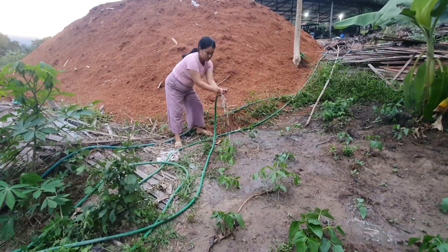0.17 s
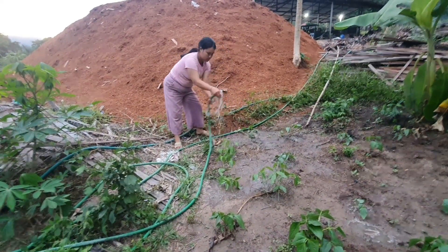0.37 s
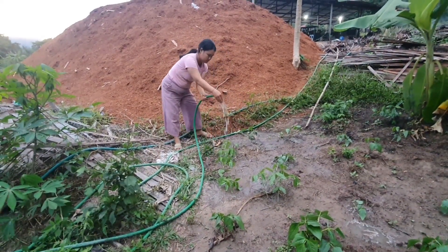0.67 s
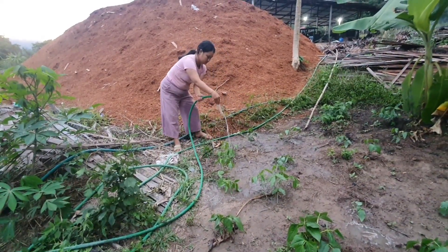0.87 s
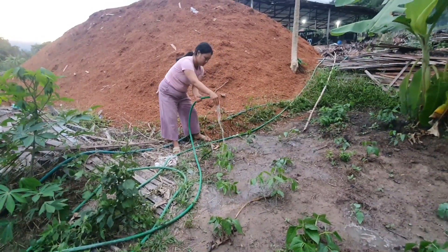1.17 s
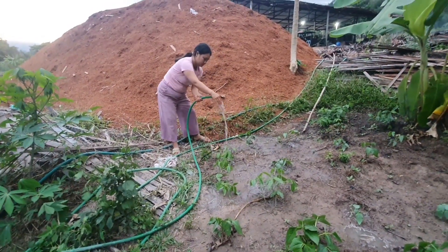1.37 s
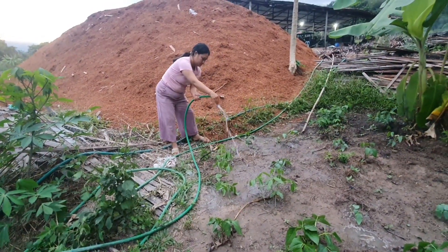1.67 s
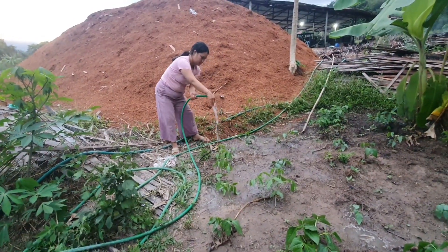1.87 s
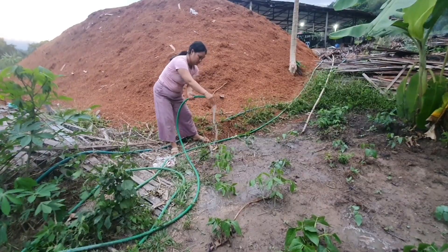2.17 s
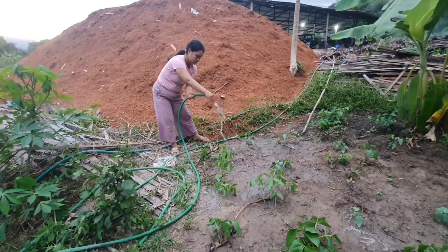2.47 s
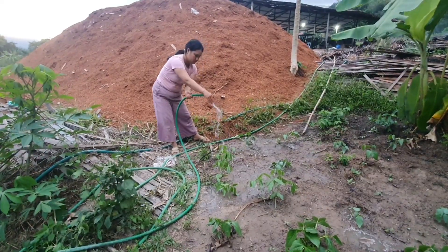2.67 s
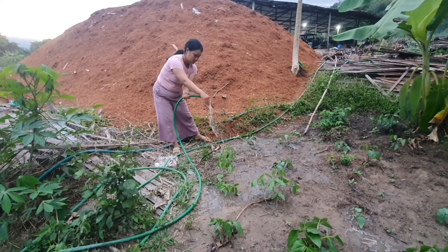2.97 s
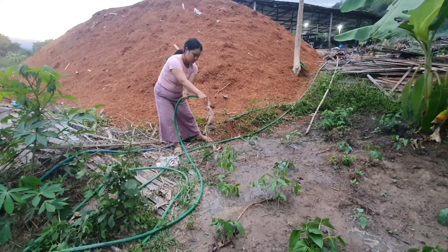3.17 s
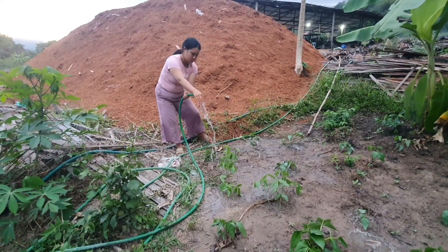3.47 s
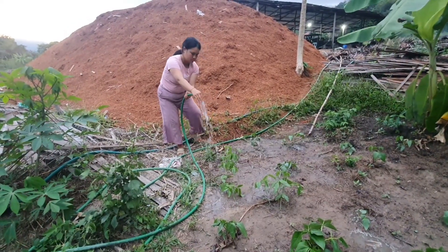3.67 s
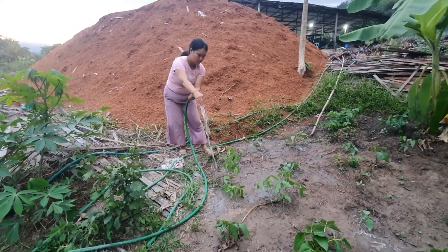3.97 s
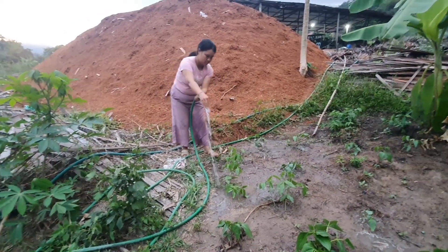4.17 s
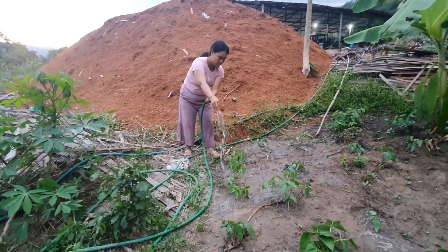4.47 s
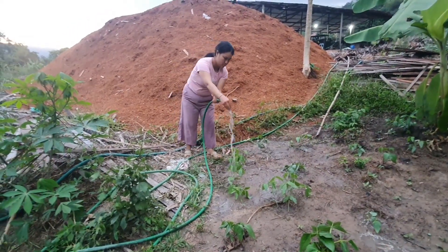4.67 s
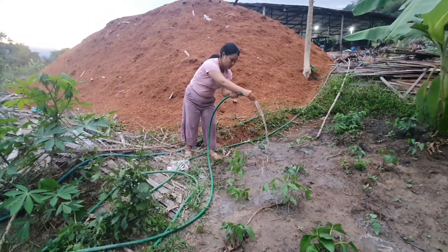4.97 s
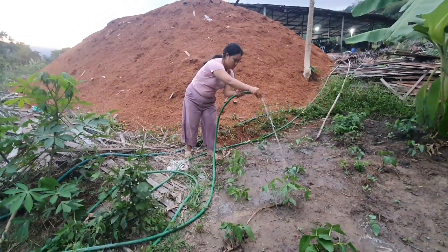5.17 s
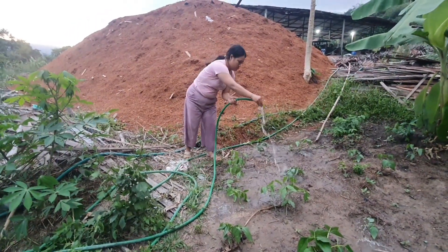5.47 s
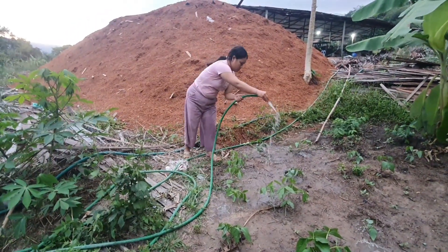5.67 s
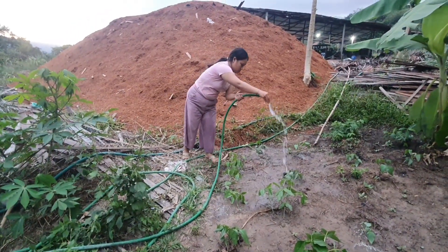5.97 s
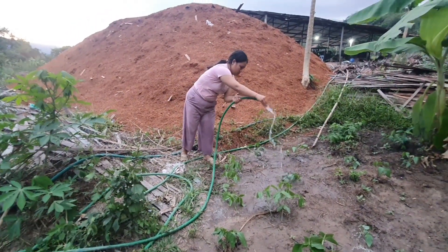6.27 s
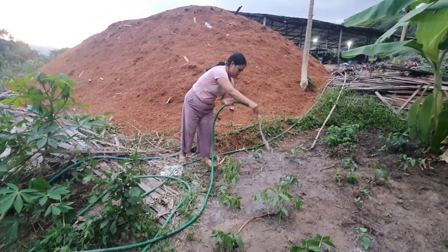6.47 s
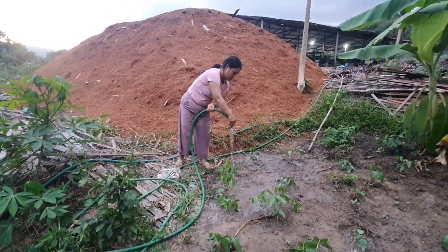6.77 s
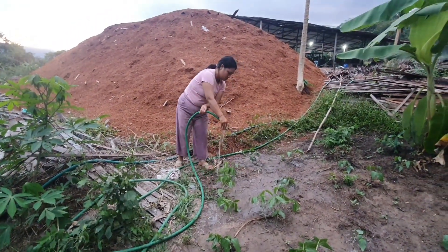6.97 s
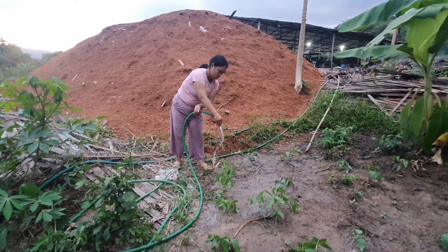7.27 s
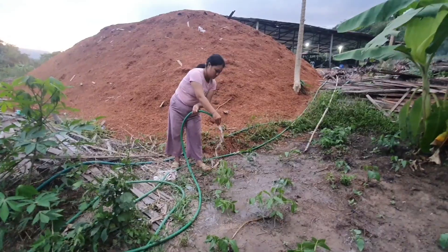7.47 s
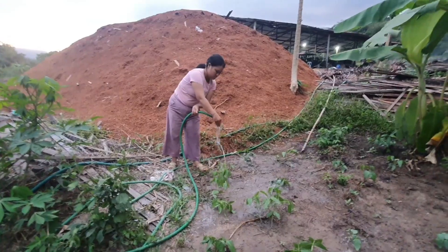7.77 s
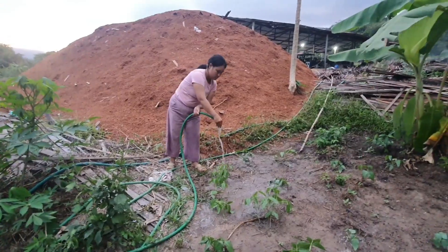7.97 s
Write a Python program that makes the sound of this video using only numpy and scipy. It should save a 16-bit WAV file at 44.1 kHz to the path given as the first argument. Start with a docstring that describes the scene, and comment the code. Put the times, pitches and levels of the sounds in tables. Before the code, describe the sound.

A garden hose pours unevenly onto mud and leaves, slapping and pattering, while a distant engine drones low and drops away near the end.

```python
"""A garden hose pours a loose stream onto wet soil and seedlings, a few metres from two microphone ports outdoors.
Short ringing noise bursts make the drops and the lumps that slap the mud; hiss makes the spray on the leaves.
Now and then the stream gushes into a puddle: rough froth from noise, bubbles from brief rising tones.
A distant engine, built from wavering tones, drones with a faint whine and drops away after six seconds.
Filtered noise gives a low, swelling murmur of open air; a faint whistle and one light knock pass by."""
import sys
import numpy as np
from scipy import signal
from scipy.fft import rfft, irfft, next_fast_len
from scipy.io import wavfile
from scipy.ndimage import uniform_filter1d

SR = 44100
rng = np.random.default_rng(int(sys.argv[2]) if len(sys.argv) > 2 else 0)


def master_out(mix):
    """Clip the mix to full scale and print it as 16-bit PCM to the path in sys.argv[1]."""
    frames = np.transpose(np.atleast_2d(mix))
    ceiling = np.clip(frames, -1, 1)
    pcm = np.round(ceiling * 32767).astype(np.int16)
    wavfile.write(sys.argv[1], SR, pcm)


N = 358136
T = np.arange(N) / SR

# Levels in the tables are relative: later gains and filters shift them.
# the stream as it lands, moving from bare mud towards the seedlings:
# t/s, patter level on mud/dB, spray level on leaves/dB
STREAM = [(0, -52, -54), (0.2, -45.5, -58), (0.32, -54.5, -69), (0.53, -64, -59), (0.6, -45, -53.5),
          (0.8, -45.5, -60), (1.15, -49, -55), (1.9, -46, -53.5), (2.22, -49, -56.5), (2.75, -41.5, -56),
          (3.2, -46.5, -52.5), (3.85, -45.5, -50.5), (4.6, -44.5, -47.5), (5.1, -45, -48),
          (5.6, -43, -47.5), (5.85, -47.5, -50.5), (6.9, -45.5, -49), (8.12, -45, -55.5)]
# tone colour of the small drops on mud: f/Hz, level/dB
PATTER_COLOUR = [(500, -1), (1000, -12), (1600, 5), (2300, -1), (3000, 2.5), (4200, 4.5), (6000, 1.5),
                 (7500, 2.5), (8600, -20), (15000, -28)]
# tone colour of the fine spray: f/Hz, level/dB
SPRAY_COLOUR = [(1500, -5.5), (3500, 10), (6000, 5), (7600, 15.5), (8600, 1.5), (10000, -0.5), (11700, 9),
                (13500, 8), (15500, 5)]
# tone colour of drops cracking on leaves: f/Hz, level/dB
LEAF_COLOUR = [(1500, -6), (4000, -1), (7500, 8.5), (9000, -2.5), (12000, 4), (15500, 1)]
# narrow bands that all splashes on this ground favour: f/Hz, level/dB
GROUND_COLOUR = [(950, -2), (1130, 3), (1400, -5), (1750, 2.5), (1950, -2), (2200, 0), (2500, 2),
                 (3020, 1.5), (3280, 0.5), (3600, -1.5), (3900, 0.5), (4250, -1.5), (4600, -0.5)]
# distant engine, speeding up a little, then throttled back: t/s, firing rate f/Hz, level of the firing tone/dB
ENGINE = [(0, 53.3, -30), (0.3, 54.2, -36), (0.45, 52.83, -32.5), (1.2, 53.74, -35), (1.8, 52.55, -36),
          (2.5, 53.06, -32.5), (3.1, 52.86, -37.5), (3.7, 53.6, -32), (4.1, 54.85, -37), (5, 56.6, -37),
          (5.35, 56.15, -32), (5.85, 56.33, -33), (6.7, 48.26, -55), (7.6, 43.9, -57), (8.12, 45.7, -48)]
# weaker engine tones: multiple of the firing rate (no unit), level relative to the firing tone/dB
ENGINE_LINES = [(0.83, -21), (1.47, -20), (2.02, -21)]
# a second, higher drone: t/s, f/Hz, level/dB
DRONE = [(0, 95, -42), (1.3, 93.1, -48), (2.03, 92.4, -38.5), (3.1, 92.3, -43), (3.5, 94, -64),
         (4.2, 95, -50), (5.4, 97.1, -49), (6.25, 99, -48.5), (6.7, 99.7, -41.5), (7.15, 101, -51),
         (8.12, 101, -49.5)]
# machine whine: t/s, relative speed (no unit), level/dB, level of its low hum/dB
WHINE = [(0, 1.008, -57.5, -62), (0.7, 0.997, -57, -59), (1.2, 0.992, -56, -59), (2.2, 0.992, -57, -59),
         (2.6, 0.995, -56.5, -70), (3.4, 1, -58, -70), (4.2, 1.012, -56, -70), (5, 1.028, -60, -82),
         (5.8, 1.03, -74, -78), (8.12, 1, -76, -87)]
# partial tones of the whine: f/Hz at speed 1, level/dB, pitch flutter/Hz
WHINE_LINES = [(377, -1.5, 1.7), (554, -1, 6), (745, -2, 3.1), (1136, -19, 6.4)]
# far machinery under the whine: t/s, level/dB
MACHINERY = [(0, -46.5), (1.5, -48.5), (2.8, -46), (3.6, -50), (5.6, -48), (6.6, -52), (8.12, -54.5)]
# its tone colour: f/Hz, level/dB
MACHINERY_COLOUR = [(120, 3), (200, 0), (280, 0.5), (500, -2.5), (750, 4), (920, -2.5), (1150, 3.5),
                    (1450, -5.5), (2500, -12.5), (6000, -29)]
# deep outdoor rumble: t/s, level/dB
RUMBLE = [(0, -40.5), (0.55, -43), (1, -44.5), (1.4, -46), (1.8, -42.5), (2.8, -41.5), (3.6, -49),
          (4.35, -41.5), (4.85, -54), (5.7, -47.5), (6.65, -52), (7, -49), (8.12, -54)]
# its tone colour: f/Hz, level/dB
RUMBLE_COLOUR = [(15, -16), (28, -5), (42, 2.5), (62, 10), (85, 4.5), (110, -0.5), (130, -11.5), (155, -9),
                 (185, -15.5), (230, -34.5), (400, -51.5)]
# swells of the wide murmur: t/s at the crest, level/dB, half-length/s
MURMUR_SWELLS = [(2.62, -53.5, 0.56), (4.01, -52, 0.16), (4.434, -52.5, 0.18), (5.59, -49.5, 0.24),
                 (6.12, -53, 0.16), (7.7, -58, 0.4)]
# tone colour of the murmur: f/Hz, level/dB
MURMUR_COLOUR = [(120, -15), (220, -14), (320, -1.5), (450, 1.5), (570, 5), (720, -20.5), (1000, -7.5),
                 (1500, -26.5), (4000, -47.5)]
# the biggest lumps of water hitting mud: t/s, level/dB, f/Hz
SLAPS = [(0.0808, -34, 3200), (0.106, -33, 3600), (0.121, -39, 3640), (0.3993, -23.5, 4650),
         (0.4296, -30.5, 2700), (0.598, -40, 3800), (0.618, -34, 4100), (0.6777, -36, 3280),
         (0.713, -33, 4230), (0.735, -35, 3020), (0.754, -31.5, 3840), (0.814, -27, 2920),
         (0.9078, -34, 4000), (0.936, -27, 4230), (0.9647, -21, 3300), (1.005, -39, 2900),
         (1.028, -31, 2840), (1.122, -35.5, 3275), (1.1744, -39, 3330), (1.188, -34, 4000),
         (1.22, -25, 2700), (1.232, -23.5, 3840), (1.251, -24.5, 4030), (1.2584, -22.5, 5800),
         (1.4003, -34, 2853), (1.413, -23.5, 3550), (1.465, -34, 2950), (1.515, -30.5, 3980),
         (1.535, -30, 3160), (1.558, -30, 3240), (1.6415, -24, 6800), (1.729, -32.5, 2800),
         (1.8372, -30.5, 4690), (1.8677, -31, 3900), (1.954, -24.5, 3280), (1.981, -34, 3300),
         (1.992, -36, 3590), (2.063, -28, 3835), (2.073, -20, 4730), (2.083, -26, 4600), (2.1, -35, 6000),
         (2.1225, -24.5, 3920), (2.139, -29, 3670), (2.1638, -31, 4050), (2.2979, -28, 3830),
         (2.328, -26, 2800), (2.4507, -32.5, 3570), (2.5209, -20.5, 2980), (2.6253, -24.5, 1970),
         (2.732, -28, 2970), (2.753, -35, 3470), (2.766, -33, 3440), (2.8785, -25, 3470),
         (2.9438, -27.5, 5360), (2.9563, -25.5, 4170), (2.9797, -23.5, 1970), (3.0638, -20.5, 1670),
         (3.277, -26.5, 5380), (3.3196, -33, 2987), (3.3573, -31, 2720), (3.484, -33, 5310),
         (3.535, -30, 2830), (3.695, -28, 4610), (4.0057, -29, 4515), (4.0246, -26, 4660),
         (4.069, -19.5, 6600), (4.2139, -24, 5610), (4.252, -24.5, 4900), (4.273, -29, 3400),
         (4.345, -35, 3026), (4.407, -21.5, 7400), (4.513, -32, 3600), (4.6826, -23, 7320),
         (4.804, -32, 3060), (4.843, -30, 1830), (4.9076, -25, 7000), (4.9119, -25, 3530),
         (4.977, -27.5, 2930), (4.995, -35, 2790), (5.0802, -34.5, 1223), (5.0814, -24, 3650),
         (5.151, -34, 3080), (5.225, -30, 3934), (5.2917, -29.5, 1483), (5.5628, -32, 3030),
         (5.5928, -28.5, 3950), (5.607, -27.5, 3960), (5.635, -30, 4470), (5.6674, -33, 2980),
         (5.7781, -34, 2080), (5.8245, -25.5, 3600), (5.8792, -28.5, 3060), (5.967, -35, 2920),
         (6.0036, -32.5, 3100), (6.03, -27.5, 2954), (6.057, -24, 7270), (6.0736, -23.5, 1266),
         (6.1885, -34, 7600), (6.2462, -25.5, 3670), (6.2657, -24.5, 3860), (6.5177, -28.5, 3850),
         (6.6104, -28, 3780), (6.689, -29, 3030), (6.651, -31, 3830), (6.7144, -31, 4110),
         (6.8165, -27.5, 3070), (6.889, -28, 3070), (6.914, -26, 3840), (7.177, -29, 4430),
         (7.219, -25.5, 3030), (7.314, -29, 6500), (7.391, -25, 3400), (7.4593, -31.5, 6340),
         (7.6478, -31, 3000), (7.7979, -24.5, 3074), (7.892, -25, 5430), (7.9693, -24, 3500),
         (8.041, -28, 3400)]
# tone colour of the slaps: f/Hz, level/dB
SLAP_COLOUR = [(700, 2), (1500, -1.5), (2500, -5), (2900, -2), (3220, -2.5), (3500, 0), (3720, -3.5),
               (3950, 0), (4500, -2), (7600, -2.5), (8800, -12.5), (15000, -3)]
# drops that crack on a near leaf: t/s, peak level/dB
LEAF_HITS = [(0.156, -28.5), (0.569, -31.5), (1.601, -31.5), (1.7768, -18), (1.788, -21), (1.928, -26),
             (2.754, -26), (3.577, -26.5), (4.069, -30), (4.22, -25), (4.469, -27), (4.909, -18.5),
             (5.916, -21), (6.263, -23), (7.368, -25.5)]
# the stream plunging into puddles, the shallow ones higher in pitch:
# t/s, level/dB, pitch relative to the usual puddle (no unit), time to fall 60 dB/s
GUSHES = [(1.222, -46, 2.2, 0.12), (2.124, -49, 1.3, 0.19), (2.749, -35, 0.98, .45),
          (2.766, -39, 1.38, 0.56), (3.063, -45, 1.1, 0.06), (4.085, -39.5, 2, 0.35),
          (4.263, -36.5, 2.4, 0.11), (6.073, -39, 1.18, 0.084), (6.361, -37, 1.05, 0.5),
          (6.376, -37.5, 1.03, 0.45), (6.398, -40, 1.47, 0.45), (6.483, -40.5, 0.94, 0.1),
          (6.639, -42.5, 0.553, 0.14), (6.872, -41, 1.63, 0.41), (6.963, -48, 1.96, 0.61),
          (7.388, -42, 0.88, 0.072), (7.591, -47.5, 0.74, 0.44), (7.803, -43, 2, 0.28),
          (7.981, -42.5, 1.04, 0.64)]
# tone colour of the usual puddle: f/Hz, level/dB
PUDDLE_COLOUR = [(80, -3), (160, 2), (300, -4.5), (550, -7.5), (800, 2), (1150, 1.5), (1450, -0.5),
                 (1820, 6.5), (2300, -12), (3800, 0), (5000, -11), (9000, -18)]
# a faint falling whistle, like a far bird: t/s, f/Hz, level/dB
WHISTLE = [(2.52, 2590, -66), (2.54, 2570, -57.5), (2.59, 2460, -53), (2.62, 2380, -60), (2.64, 2346, -80)]
# a light knock close by on the left: t/s, peak level/dB
KNOCKS = [(3.8552, -18)]
# tone colour of the knock: f/Hz, level/dB
KNOCK_COLOUR = [(100, 17), (220, 5), (400, 14), (700, 11), (1200, 8), (2200, 8), (3000, -9), (4200, 3),
                (8000, -16), (15000, -32)]
# distant sound at the two ports: f/Hz, phase by which the right leads/rad, level of the unshared part/dB
FAR_PORTS = [(60, 0.13, -6), (140, 0.41, -13), (215, 0.43, -13), (294, 1.14, -9), (413, 1.72, -5),
             (550, 2.45, -12.5), (780, 2.75, -3), (1120, 3.13, -5.5), (1640, 4, -3.5), (2530, 4.64, 4.5)]
# right microphone port relative to the left: f/Hz, level/dB
RIGHT_PORT = [(60, 1), (200, 1.5), (400, 6), (700, 3), (1300, 1.5), (1800, 2.5), (2400, 1.5), (3000, 5),
              (3450, 3.5), (4000, 6.5), (5200, 0.5), (6800, -1), (8100, -2), (9300, 1), (11500, 3.5),
              (15000, -2)]

# how far the unsteady hose sways the stream's level
SLOP_DB = 0.7
# time for a fat drop to fade by 60 dB
DROP_T60_S = 0.026
# smaller lumps fall at random, as strong as the stream is on the mud
LUMPS_PER_S, LUMP_ABOVE_PATTER_DB, LUMP_SPREAD_DB = 7.7, 13, -6.5
LUMP_HZ, LUMP_OCTAVES = 3300, 0.314
# the first contact of a lump is a pressure snap of about one cycle, heard best on the left
SNAP_DB, SNAP_RIGHT_DB, SNAP_CYCLES, SNAP_LAG_S = 1.5, -10, 0.55, 0.0009
# every slap in the table throws up droplets that fall back as extra patter, every leaf hit as extra spray
SHOWER_RISE_S, SHOWER_T60_S = 0.003, 0.045
MUD_SHOWER_DB, LEAF_SHOWER_DB = -19, -37  # relative to the hit
# part of the splashes' sound reaches the right port as a late copy of the left: lag and amplitude share
WATER_LAG_S, WATER_SHARE = 0.00142, 0.4
# low hum under the whine, at speed 1
HUM_HZ, HUM_FLUTTER_DB, HUM_FLUTTER_HZ = 188, 1.8, 7
# murmur level between the swells, before its gain
MURMUR_REST_DB = -60
# the treble is cut above this
TOP_HZ = 15600


def undb(db):
    """Turn decibels into a gain."""
    return 10 ** (np.asarray(db) / 20)


def unit(x):
    """Scale to an rms (average strength) of 1."""
    return x / np.sqrt(np.mean(x ** 2))


def curves(table):
    """The columns of a table, joined by straight lines in time."""
    s, *columns = np.transpose(table)
    return [np.interp(T, s, column) for column in columns]


def colour(x, points):
    """Filter through (f/Hz, level/dB) points, with no sound ahead of its cause (minimum phase)."""
    size = next_fast_len(x.shape[-1] + 4096, real=True) // 2 * 2
    size = 2 * next_fast_len(size // 2, real=True)
    hz, db = np.transpose(points)
    f = np.maximum(np.arange(size // 2 + 1) * SR / size, 1)
    gain = undb(np.interp(np.log(f), np.log(hz), db))
    # folding the cepstrum (the spectrum of the log gain) forward makes the filter causal
    cepstrum = irfft(np.log(gain))
    cepstrum[1:size // 2] *= 2
    cepstrum[size // 2 + 1:] = 0
    response = np.exp(rfft(cepstrum))
    return irfft(rfft(x, size) * response)[..., :x.shape[-1]]


def resonate(x, hz, q):
    """One resonance, gain 1 at its centre; a larger q rings longer."""
    hz = min(hz, SR / 3)
    b, a = signal.iirpeak(hz, max(q, 1.8 * hz / SR), fs=SR)
    return signal.lfilter(b, a, x)


def walk(rate):
    """Wandering random values: a new one every 1 / rate s, smoothed twice, with rms 1."""
    k = max(int(SR / rate), 1)
    steps = np.repeat(rng.standard_normal(N // k + 1), k)
    smooth = uniform_filter1d(uniform_filter1d(steps, k), k)
    return unit(smooth[:N])


def fade(t, t60):
    """Exponential decay that falls by 60 dB in t60 seconds."""
    return np.exp(-np.log(1000) * t / t60)


def add(out, s, x):
    """Mix a sound in at time s."""
    i = int(np.clip(s * SR, 0, N - 1))
    out[:, i:i + x.shape[1]] += x[:, :N - i]


def tone(hz):
    """A sine of rms 1 that follows a pitch curve."""
    return np.sqrt(2) * np.sin(2 * np.pi * np.cumsum(hz) / SR)


def from_afar(x):
    """Turn the right port's phase against the left, by an angle that grows with pitch."""
    hz, lead, _ = np.transpose(FAR_PORTS)
    size = next_fast_len(N, real=True)
    turn = np.interp(np.arange(size // 2 + 1) * SR / size, hz, lead)
    right = irfft(rfft(x[1], size) * np.exp(1j * turn), size)[:N]
    return np.array([x[0], right])


def stereo_noise(points):
    """Coloured distant noise: one part shared by both ports, and a part of its own at each."""
    noise = colour(rng.standard_normal((3, N)), points)
    own = colour(noise[1:], [(hz, db) for hz, _, db in FAR_PORTS])
    return unit(from_afar(noise[0] + own))


def from_ground(x):
    """The splashes take on the ground's colour and come partly late to the right port."""
    left, right = colour(x, GROUND_COLOUR)
    late = np.pad(left, (int(WATER_LAG_S * SR), 0))[:N]
    return np.array([left, np.sqrt(1 - WATER_SHARE ** 2) * right + WATER_SHARE * late])


def spurts(rate=110, spread_db=3.2, t60=0.024, rest_db=-5):
    """The stream arrives as a string of blobs: each starts at once and is spent in a few milliseconds."""
    t, count = np.arange(4096) / SR, int(rate * N / SR)
    when, size = rng.random((count, 2)).T
    size = undb(spread_db * np.minimum(-np.log(1 - size), 3))
    starts = np.bincount((when * N).astype(int), size ** 2, N)
    power = signal.oaconvolve(starts, fade(t, t60) ** 2)[:N]
    return unit(np.sqrt(np.abs(power) / power.mean() + undb(rest_db) ** 2))


def impacts(rate, spread_db, bunching):
    """Clicks of very unequal size, in bunches; each reaches the two ports at its own lag."""
    draw = rng.random((int(rate * N / SR), 4))
    # clicks are likelier where the bunching curve is high
    chance = np.cumsum(bunching)
    at = np.searchsorted(chance, draw[:, 0] * chance[-1])
    sign = np.sign(draw[:, 2] - .5)
    size = undb(spread_db * np.minimum(-np.log(1 - draw[:, 1]), 4.5)) * sign
    lag = ((draw[:, 3] - .5) * 44).astype(int)  # samples: half a millisecond either way
    return np.array([np.bincount(i % N, size, N) for i in (at, at + lag)])


def splat(t, t60, burst):
    """A click of first contact, then a fading noise burst as the drop breaks up."""
    return (t == 0) + burst * fade(t, t60) * rng.standard_normal((2, len(t)))


def patter(bunching, rate=110, spread_db=3, q=6, t60=0.032, burst=0.15, count=24):
    """Small drops of many sizes land on mud; each size has its own brief ring."""
    t, out = np.arange(1024) / SR, 0
    for hz in np.geomspace(1300, 8000, count):
        drop = resonate(splat(t, t60, burst), hz, q)
        clicks = impacts(rate, spread_db, bunching)  # rate is per drop size
        out = out + signal.oaconvolve(clicks, drop, axes=1)[:, :N]
    return unit(colour(out, PATTER_COLOUR))


def smack(hz, hold, t60, q, wet_db, bubble_db, rise=0.003):
    """A drop flattens, tears open and traps a tiny bubble; its energy is that of rms 1 for 5 ms."""
    t = np.arange(2048) / SR
    tear = np.minimum(fade(t - hold, t60), 1) * (1 - np.exp(-t / rise))
    tear = tear + undb(wet_db) * fade(t, t60=0.65)  # faint wet tail
    noise = tear * rng.standard_normal((2, len(t)))
    crater = unit(resonate(resonate(noise, hz, q), hz, q=0.29))
    # the bubble rings some sixty cycles and rises in pitch as it nears the surface; the ports hear it out of step
    cycles = hz * t * (1 + 2 * t) + rng.random((2, 1))
    bubble = np.sin(2 * np.pi * cycles) * fade(t, 65 / hz)
    x = crater + undb(bubble_db) * unit(bubble)
    return x / np.sqrt(np.sum(x ** 2) / (SR / 100))


def drops(rate=70, centre_hz=4100, octaves=.55, spread_db=1.5, hold=0.00039, q=4, wet_db=-26):
    """Single fat drops stand out of the patter, each with its own pitch and length; some ring, some only smack."""
    out, count = np.zeros((2, N)), int(rate * N / SR)
    for (when, size, length, ring), pitch in zip(rng.random((count, 4)), rng.standard_normal(count)):
        hz = centre_hz * 2 ** (octaves * pitch)
        db = spread_db * min(-np.log(1 - size), 3)
        bubble_db = -9 + 16 * ring
        if 1900 < hz < 7900:  # pitches outside this range are left out
            drop = smack(hz, 2 * hold * length, DROP_T60_S, q, wet_db, bubble_db)
            add(out, when * N / SR, undb(db) * drop)
    # soft mud swallows the low pitches and favours two narrow bands
    return colour(out, [(1500, -9.5), (2500, -10.5), (3000, -6), (3450, -10), (3950, -5.0), (4700, -1.5),
                        (7500, 3.5), (8800, 3.5)])


def spray(bunching, rate=30, flicker_db=1):
    """Countless tiny droplets rebound: a fine hiss that flickers."""
    hiss = colour(rng.standard_normal((2, N)), SPRAY_COLOUR)
    flicker = undb(flicker_db * walk(rate))
    return unit(hiss * np.sqrt(bunching) * flicker)


def leaf_ticks(rate=45, spread_db=3.5, t60=0.08, burst=0.26):
    """Drops that strike a leaf crack sharply and shatter into a short fizz."""
    out, t, count = np.zeros((2, N)), np.arange(2048) / SR, int(rate * N / SR)
    for when, size, length in rng.random((count, 3)):
        db = spread_db * min(-np.log(1 - size), 3)
        add(out, when * N / SR, undb(db) * splat(t, t60 * (.5 + length), burst))
    return unit(colour(out, LEAF_COLOUR))


def engine(firing_db=-1.5, fading_db=-0.5):
    """From far off the engine's firing tone carries, with weaker, wavering tones around it."""
    hz, db = curves(ENGINE)
    lows = tone(hz) * undb(db + firing_db + fading_db * walk(rate=11))
    for multiple, line_db in ENGINE_LINES:
        level = undb(db + line_db + 2 * walk(rate=2.8))
        lows = lows + tone(multiple * hz + walk(rate=7)) * level
    return lows


def drone(drone_db=-3.0):
    """A second, higher drone: one tone that wavers in pitch and level."""
    hz, db = curves(DRONE)
    return tone(hz + walk(rate=11) / 2) * undb(db + drone_db + walk(rate=8))


def whine(whine_db=0, waver=0.0021, flutter_db=3.5):
    """A low hum and higher partial tones rise and fall in pitch with one machine speed."""
    speed, level, hum_level = curves(WHINE)
    speed = speed * (1 + waver * walk(rate=14))
    hum_hz = HUM_HZ * speed + HUM_FLUTTER_HZ * walk(rate=40)
    hum = tone(hum_hz) * undb(hum_level + HUM_FLUTTER_DB * walk(rate=18))
    # each partial arrives by several paths, so it flutters on its own
    partials = 0
    for f, db, flutter_hz in WHINE_LINES:
        partial = tone(f * speed + flutter_hz * walk(rate=30))
        partials = partials + partial * undb(db + flutter_db * walk(rate=15))
    both = hum + partials * undb(level + whine_db)
    return from_afar([both, both])


def machinery(flutter_db=1.9):
    """Far machinery clatter, made of coloured noise with an unsteady level."""
    return stereo_noise(MACHINERY_COLOUR) * undb(curves(MACHINERY)[0] + flutter_db * walk(rate=13))


def rumble(rumble_db=3, gust_db=2.5):
    """Deep outdoor rumble: low noise whose level wanders slowly."""
    level = undb(curves(RUMBLE)[0] + rumble_db + gust_db * walk(rate=4.8))
    return stereo_noise(RUMBLE_COLOUR) * level


def murmur(murmur_db=4, flutter_db=2.2):
    """A wide murmur of noise that swells and sinks."""
    power = undb(MURMUR_REST_DB) ** 2
    for s, db, half in MURMUR_SWELLS:
        power = power + (undb(db) * np.exp(-((T - s) / half) ** 2 / 2)) ** 2
    level = np.sqrt(power) * undb(murmur_db + flutter_db * walk(rate=12))
    return stereo_noise(MURMUR_COLOUR) * level


def small_lumps():
    """Random lesser slaps: rows of t/s, level/dB, f/Hz."""
    draw = rng.random((int(LUMPS_PER_S * N / SR), 3))
    at = (draw[:, 0] * N).astype(int)
    size, pitch = 2 * draw[:, 1:].T - 1
    db = curves(STREAM)[0][at] + LUMP_ABOVE_PATTER_DB + LUMP_SPREAD_DB * size
    return list(zip(at / SR, db, LUMP_HZ * 2 ** (LUMP_OCTAVES * pitch)))


def snap(hz):
    """One sharp swing of pressure, as long as a cycle or so of the crater's pitch."""
    cycles = (np.arange(256) / SR - SNAP_LAG_S) * hz
    swing = np.exp(-(cycles / SNAP_CYCLES) ** 2) * np.cos(2 * np.pi * cycles)
    return swing * undb([[0], [SNAP_RIGHT_DB]])


def slaps(hold=0.00013, t60=0.011, q=2.5, wet_db=-28, bubble_db=-3, gain_db=-8.0,
          crack_db=-16, crack_hz=5900, flop_db=-6, flop_hz=2500, flop_s=0.001322):
    """Lumps of water smack the mud: a snap and a sharp crack, the crater's ring, then the rest flops down."""
    out, snaps = np.zeros((2, 2, N))
    for s, db, hz in SLAPS + small_lumps():
        add(snaps, s, undb(db + SNAP_DB) * snap(hz))
        body = smack(hz, hold, t60, q, wet_db, bubble_db, rise=0.0011)
        crack = smack(crack_hz, hold, t60, q=4.3, wet_db=-31.0, bubble_db=-42)
        hit = undb(gain_db) * body + undb(crack_db) * crack
        add(out, s + SNAP_LAG_S / 2, undb(db) * hit)
        # the flop is broad, and lies between the crater's pitch and that of the soft mud
        flop = smack(np.sqrt(hz * flop_hz), hold, t60, q=1.35, wet_db=-18.5, bubble_db=-40)
        add(out, s + flop_s, undb(db + gain_db + flop_db) * flop)
    return colour(out, SLAP_COLOUR) + colour(snaps, [(7500, 0.5), (9000, -4)])


def showers(hits):
    """Level of the droplets that fall back after each hit: a quick rise, then a decay."""
    out, t = np.zeros((1, N)), np.arange(SR // 2) / SR
    shape = (1 - np.exp(-t / SHOWER_RISE_S)) * fade(t, SHOWER_T60_S)
    for s, db, *_ in hits:
        add(out, s, undb(db) * shape[None])
    return out[0]


def leaf_hits(t60=0.037, burst=0.49):
    """Drops crack on leaves close by: a click and a short burst of noise."""
    out, t = np.zeros((2, N)), np.arange(2048) / SR
    for s, db in LEAF_HITS:
        x = colour(splat(t, t60, burst), LEAF_COLOUR)
        add(out, s, undb(db) * x / np.abs(x).max())
    return out


def gushes(rise=0.00038, grain_db=2.0, bubble_db=-3, bubble_hz=1600, count=24):
    """The stream churns a puddle: rough froth and a crowd of small bubbles that dies away."""
    out, t = np.zeros((2, N)), np.arange(SR // 2) / SR
    u = t[:1024]  # time within one bubble
    churn = undb(grain_db * walk(rate=250))
    for s, db, pitch, t60 in GUSHES:
        noise = rng.standard_normal((2, len(t))) * np.roll(churn, -int(s * SR))[:len(t)]
        froth = unit(colour(noise, [(hz * pitch, d) for hz, d in PUDDLE_COLOUR]))
        add(out, s, froth * undb(db) * (1 - np.exp(-t / rise)) * fade(t, t60))
        for when, size, left, right in rng.random((count, 4)):
            age = when * t60 / 2
            hz = bubble_hz * pitch * 2 ** (2 * size - 1)  # within an octave either way
            cycles = hz * u * (1 + 5 * u) + np.array([[left], [right]])
            bubble = np.sin(2 * np.pi * cycles) * fade(u, 40 / hz)
            add(out, s + age, 2 * bubble * undb(db + bubble_db) * fade(age, t60))
    return out


def whistle(flutter_db=1.5, flutter_hz=15):
    """One thin, unsteady note that slides down."""
    hz, db = curves(WHISTLE)
    note = tone(hz + flutter_hz * walk(rate=240)) * undb(db + flutter_db * walk(rate=110))
    return note * (T > WHISTLE[0][0]) * (T < WHISTLE[-1][0])


def knocks(t60=0.013, burst=0.05, right_db=-8):
    """A dry, dull knock: a click and a brief noise burst, weaker on the right."""
    out, t = np.zeros((2, N)), np.arange(4096) / SR
    for s, db in KNOCKS:
        x = colour(splat(t, t60, burst), KNOCK_COLOUR)
        add(out, s, x / np.abs(x).max() * undb([[db], [db + right_db]]))
    return out


def scene(patter_db=-7.5, drops_db=1.0, spray_db=0.0, ticks_db=-1, bunch_db=2.0, wash_db=-9):
    """Patter and spray share the stream's spurts, over the even wash of running water; then all else joins."""
    mud_db, leaf_db = curves(STREAM)
    slop_db = SLOP_DB * walk(rate=20)
    on_mud = np.hypot(undb(mud_db + slop_db), undb(MUD_SHOWER_DB) * showers(SLAPS))
    on_leaves = np.hypot(undb(leaf_db + slop_db), undb(LEAF_SHOWER_DB) * showers(LEAF_HITS))
    bunching, blobs = undb(bunch_db * walk(rate=90)), spurts()
    wash = unit(colour(rng.standard_normal((2, N)), PATTER_COLOUR))
    mud = patter(bunching) * blobs * undb(patter_db)
    mud = mud + drops() * undb(drops_db) + wash * undb(wash_db)
    leaves = spray(blobs) * undb(spray_db) + leaf_ticks() * undb(ticks_db)
    splashes = from_ground(mud * on_mud + slaps() + gushes())
    water = splashes + leaves * on_leaves + leaf_hits()
    distance = engine() + drone() + whine() + machinery() + rumble() + murmur()
    return water + distance + whistle() + knocks()


def record(dry):
    """The two ports colour the sound differently, half of the contrast at each; the top is cut."""
    ports = [colour(x, [(hz, share * db) for hz, db in RIGHT_PORT]) for x, share in zip(dry, (-.5, .5))]
    low_pass = signal.ellip(10, .2, 80, TOP_HZ, fs=SR, output="sos")
    return signal.sosfilt(low_pass, np.array(ports))


dry = scene()
out = record(dry)
master_out(out)
```